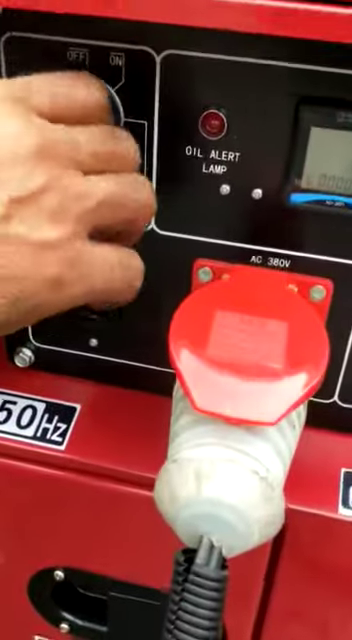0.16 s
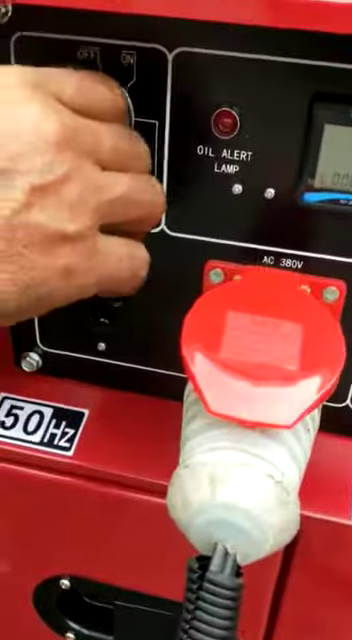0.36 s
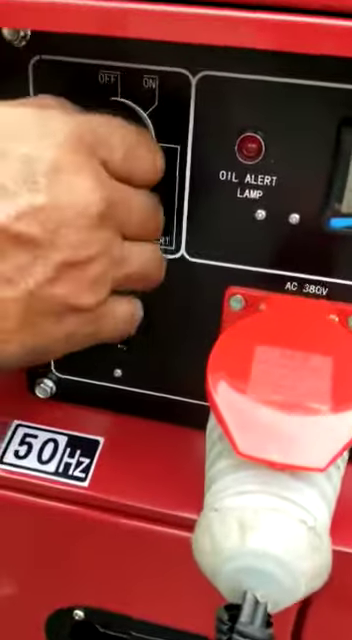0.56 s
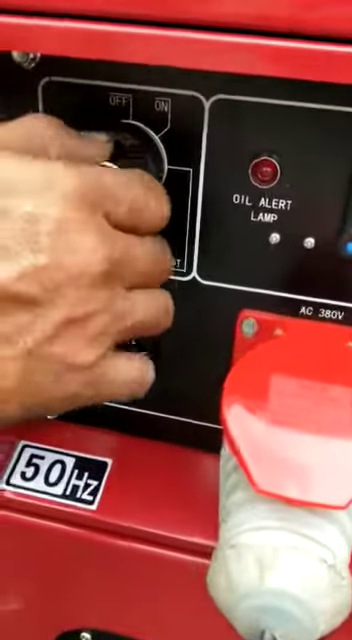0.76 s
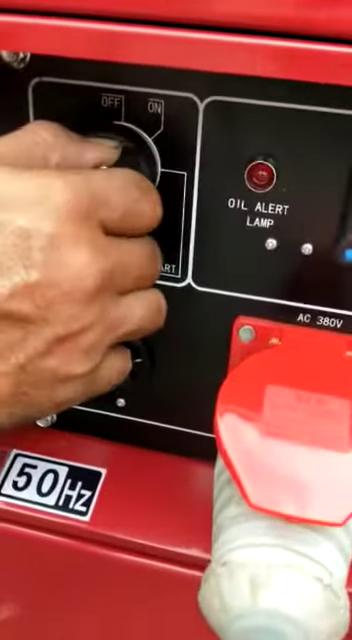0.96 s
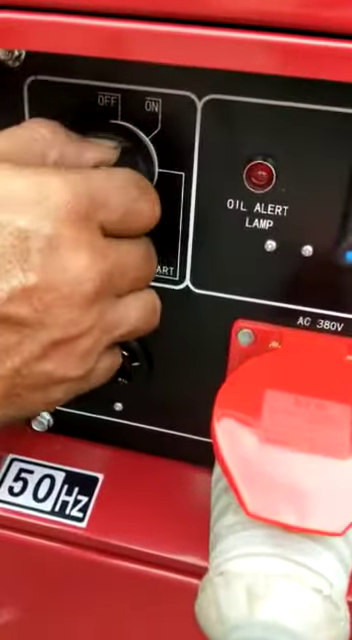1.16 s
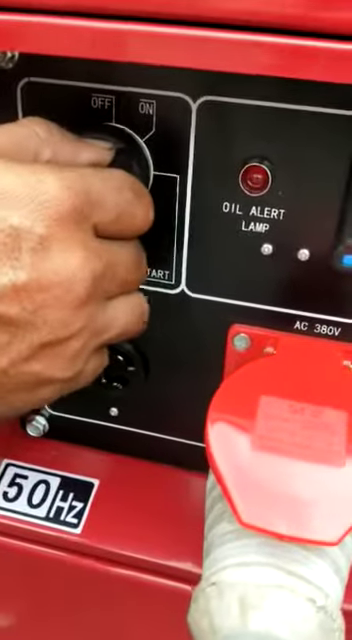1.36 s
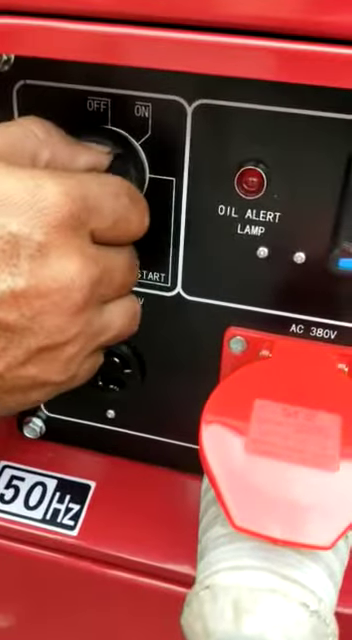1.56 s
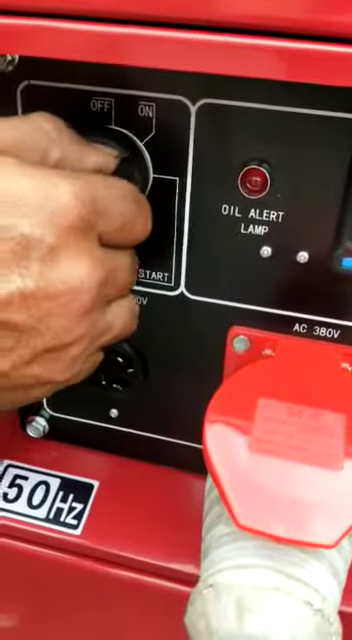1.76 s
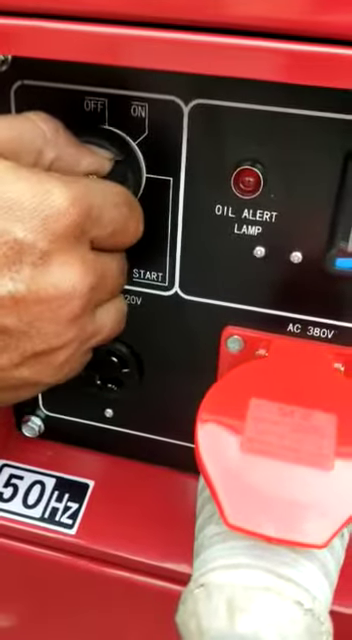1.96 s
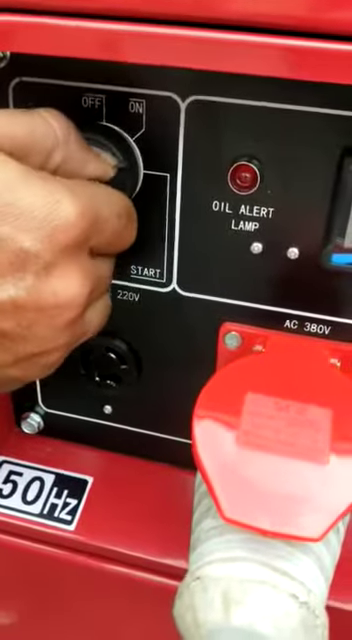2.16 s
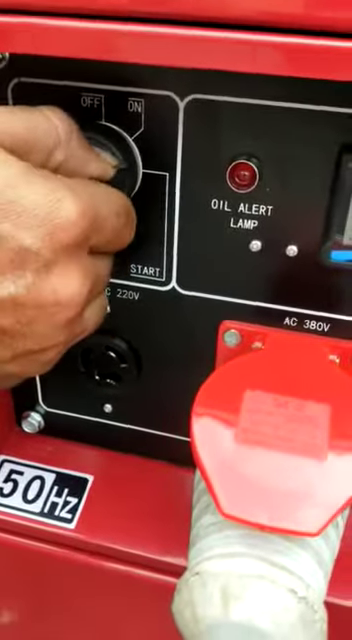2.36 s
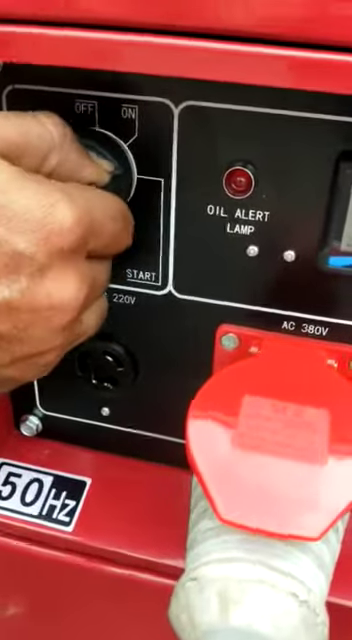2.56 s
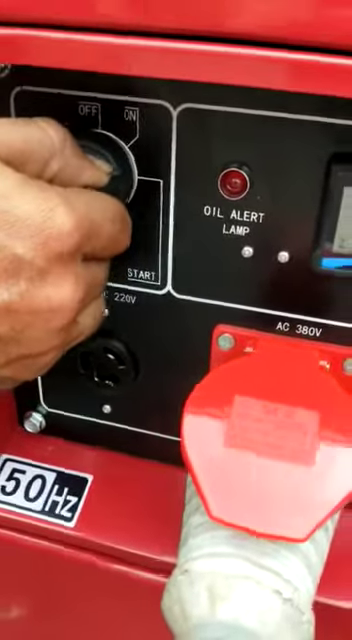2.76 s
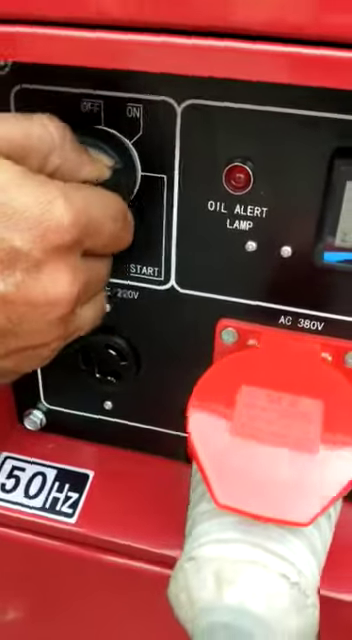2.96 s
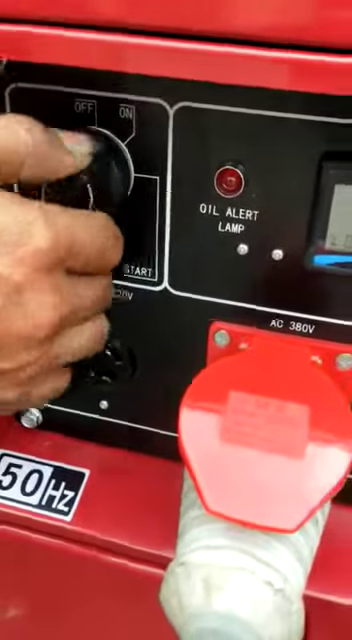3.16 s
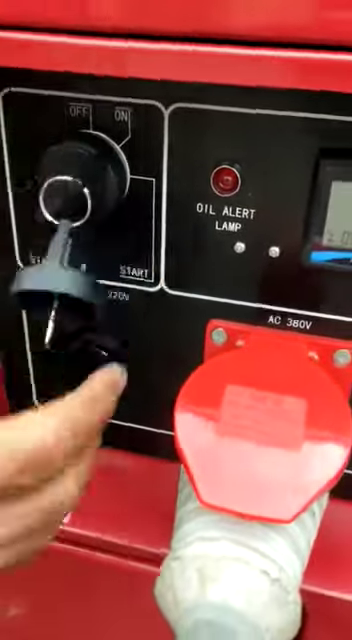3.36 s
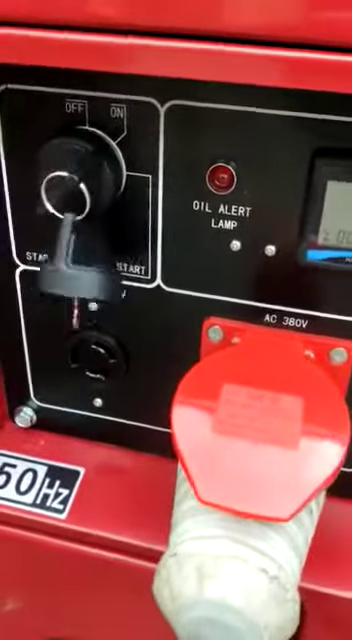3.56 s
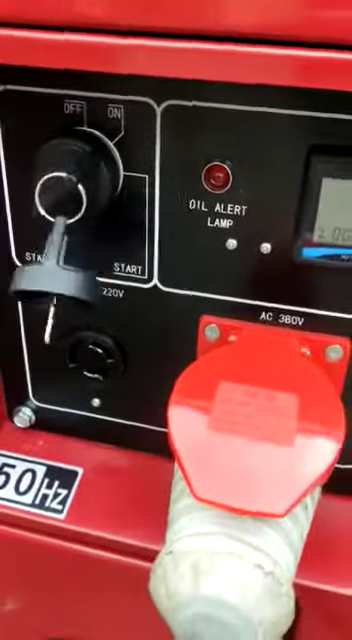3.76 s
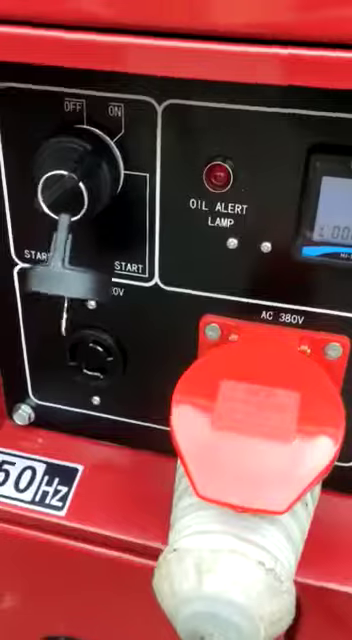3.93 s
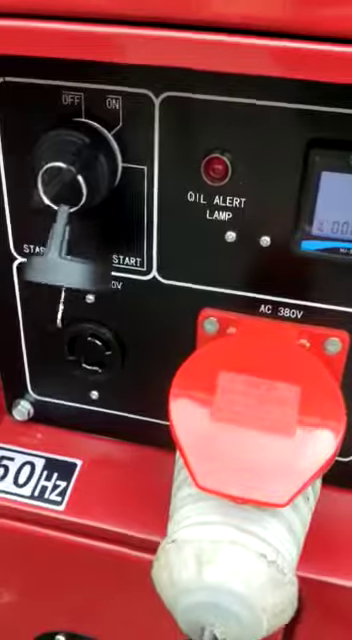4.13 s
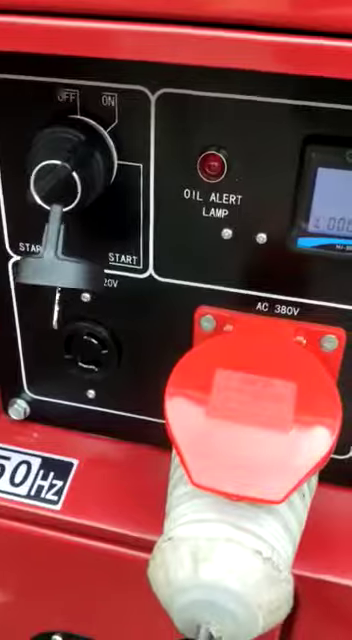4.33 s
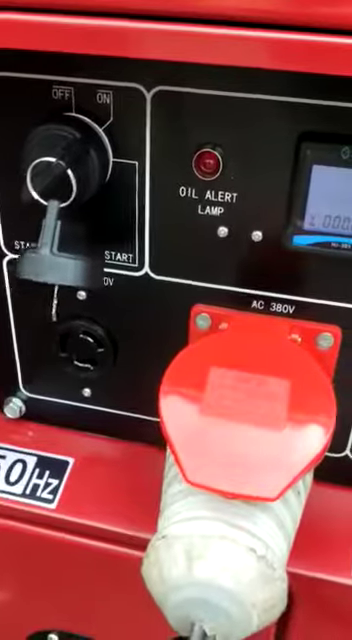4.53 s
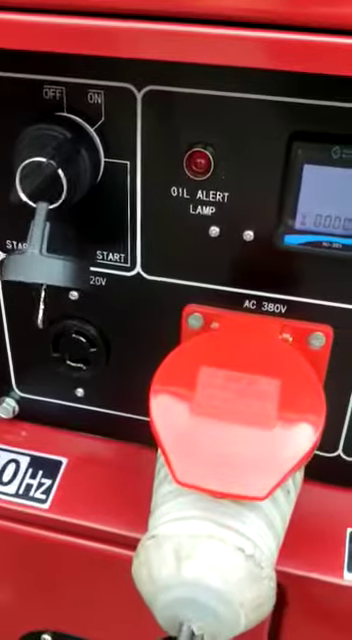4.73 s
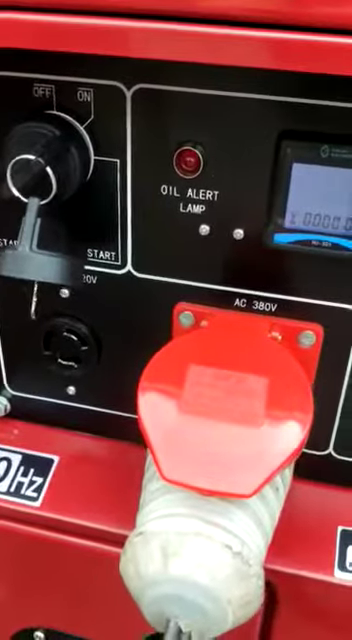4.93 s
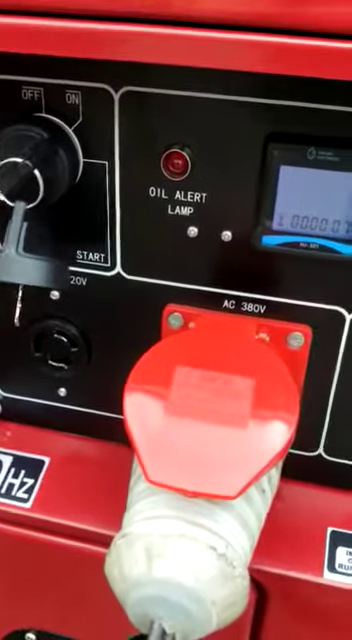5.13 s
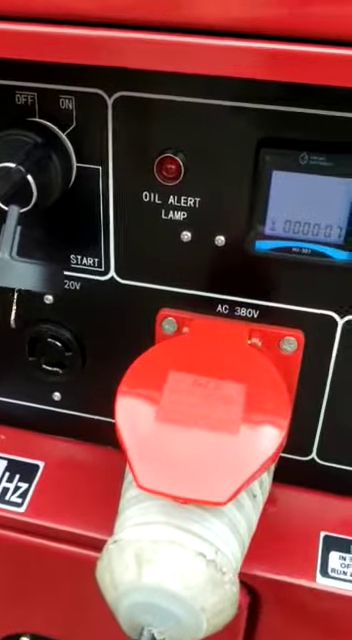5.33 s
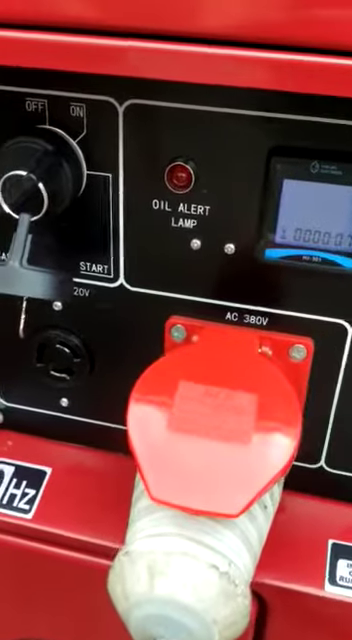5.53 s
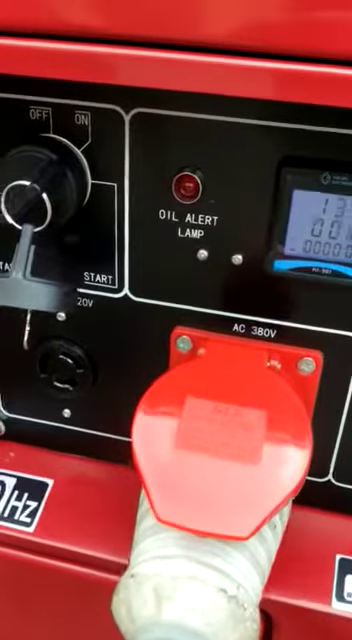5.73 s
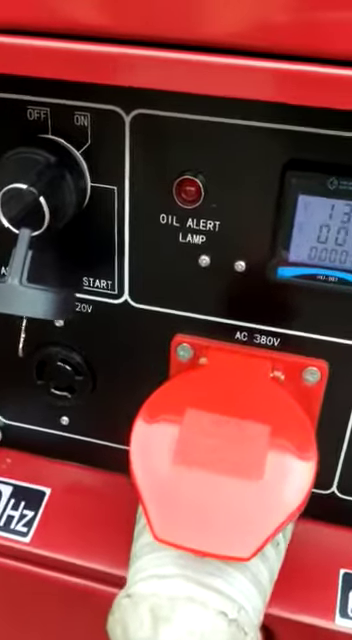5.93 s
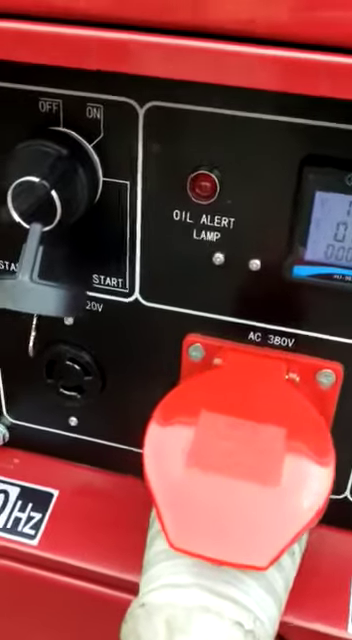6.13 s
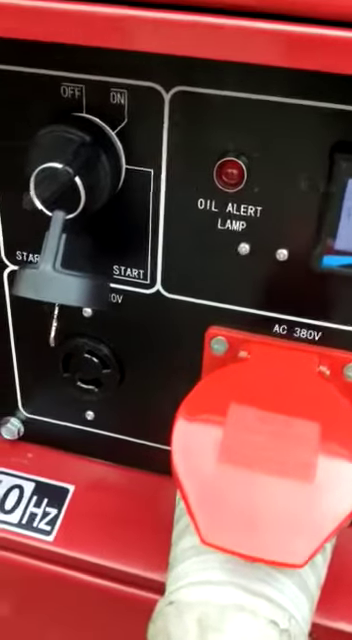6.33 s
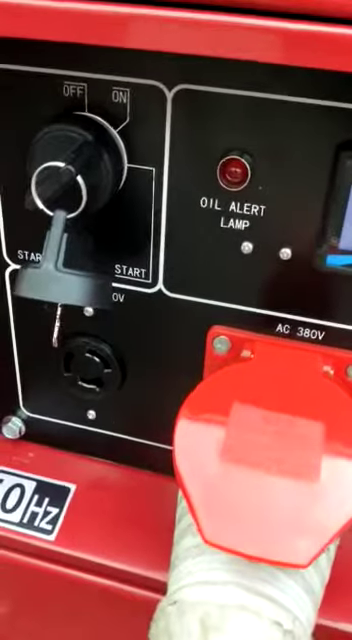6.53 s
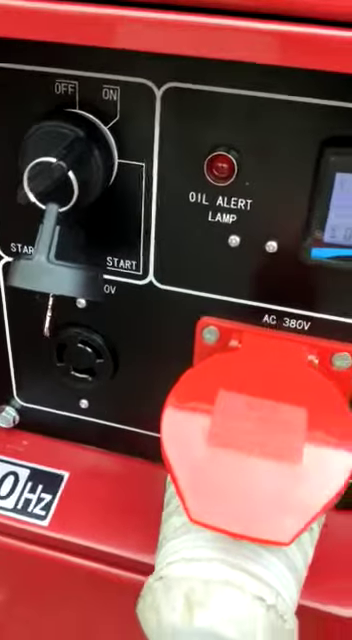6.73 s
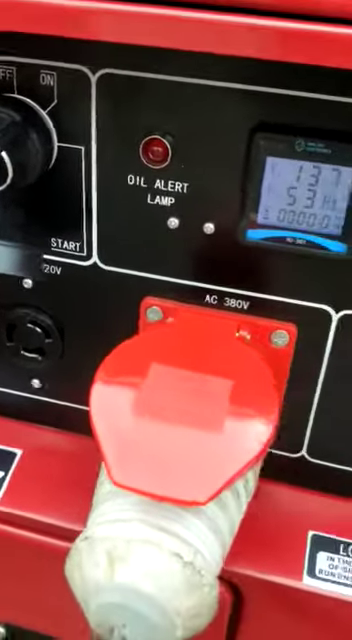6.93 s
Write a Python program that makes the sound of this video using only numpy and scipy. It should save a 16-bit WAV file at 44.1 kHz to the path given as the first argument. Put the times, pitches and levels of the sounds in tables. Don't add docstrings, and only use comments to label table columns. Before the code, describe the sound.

Quiet distant traffic and twittering birds, heard by a close stereo phone microphone. A key snaps over early on; two seconds in, a metallic clunk and short rising electric whine crank a cold single-cylinder diesel. Separate thuds ring the block and steel cabinet, quickening until they merge into a harsh, booming drone, briefly easing before steady loud running.

```python
import sys
import numpy as np
from scipy import signal
from scipy.fft import rfft, irfft, next_fast_len
from scipy.io import wavfile
from scipy.ndimage import uniform_filter1d

SR = 44100
rng = np.random.default_rng(int(sys.argv[2]) if len(sys.argv) > 2 else 0)


def store_wav(level_fs):
    pcm = np.round(np.clip(np.atleast_2d(level_fs), -1, 1) * 32767)
    wavfile.write(sys.argv[1], SR, pcm.T.astype(np.int16))


def invert_db(x):
    u = np.asarray(x, float) / 20
    return 10 ** u


N = 312669
TIME = np.arange(N) / SR

# time in seconds, firings per second.
SPEED = [(2.59, 5.836), (2.8, 6.441), (3.0, 8.51), (3.3, 12.341), (4.0, 22.142), (4.3, 26.019),
         (4.5, 27.074), (4.6, 25.644), (4.7, 26.735), (4.9, 26.424), (7.09, 26.358)]
# time in seconds, force of combustion in dB.
FUEL = [(2.76, -1.5), (3.5, 1.5), (4.1, 1.5), (4.41, 0.5), (4.45, -6), (4.59, -3.5), (4.64, 2),
        (4.75, -1.5), (5.2, -0.5), (6.5, 2), (7.09, 2)]
# share of the cycle, level in dB.
VALVES = [(0.296, -6), (0.562, -3.5), (.86, -7)]
# level in dB, dB per dB of fuel, gain at full speed in dB,
# gain once governed in dB, gain with the starter gear still in mesh in dB.
LAYERS = [
    (-24, 0.26, 6.5, 1.9, -0.5),
    (-21, 0.23, -1.67, -1, 2),
    (-23, 1.1, -0.6, 1.6, 3.1),
    (-40.5, 2.4, 6, -3.4, 0.5),
    (-32.5, 0.63, 3.5, -4, 9.5),
]


def engine():
    (speed,), (fuel_db,) = curves(SPEED), curves(FUEL)
    cycle = np.cumsum(speed * (TIME >= SPEED[0][0])) / SR
    governed = np.clip((speed - 15) / 11, 0, 1)
    locked = np.clip((TIME - 4.2) / 0.73, 0, 1)
    meshed = np.clip((2.97 - TIME) / 0.0167, 0, 1)
    exhaust_db, boom_db, knock_db, ping_db, clatter_db = [
        db + share * fuel_db + fast_db * governed + held_db * locked + mesh_db * meshed
        for db, share, fast_db, held_db, mesh_db in LAYERS]

    fuel = np.clip((fuel_db + 9) / 9, .1, 1)
    firing = fuel * strokes(cycle, 0, scatter_db=1.2)
    valves = sum(invert_db(db) * strokes(cycle, angle, scatter_db=1.) for angle, db in VALVES)

    sound = exhaust(cycle, governed, exhaust_db)
    sound += cabinet_boom(cycle, firing, valves, locked, boom_db)
    sound += block_knock(cycle, firing, valves, governed, locked, knock_db)
    sound += panel_rasp(firing, valves, locked, fuel_db)
    sound += metal_ping(firing, ping_db)
    sound += clatter(firing, valves, governed, locked, clatter_db)
    return sound * np.clip((TIME - 2.735) / 0.0041, 0, 1)


# frequency in Hz, width in Hz, level in dB.
MUFFLER = [(79.6, 101, -7.5), (127, 17.6, 3), (189.8, 24.5, -3), (263, 38, -3), (347, 70, -9.5)]
# multiple of the firing rate, level in dB.
DRONE = [(1, -36.5), (2, -17), (3, -3.5), (4, 1.5), (5, -5), (6, -12), (7, -4.5), (8, -15), (9, -9.5),
         (10, -27.5), (11, -10), (12, -43.5)]
# multiple of the firing rate, level in dB.
RUNUP = [(5, -20), (7, -2.5), (10, -3), (11, -3), (12, -8)]
# start in seconds, attack in seconds, hold in seconds,
# time to fall 60 dB in seconds, level in dB.
SWEEP = [(3.5, 0.13, 0.4, 2.4, -25)]


def exhaust(cycle, governed, level_db):
    warming_db = 0.7 * np.clip(TIME - 5, 0, None)
    breaths = strokes(cycle, .28, 1.5) + .8 * strokes(cycle, .6, 1.5)
    puffs = burst(breaths, modes(MUFFLER), t60=0.14, fresh=0.13, steady=1.0, blow=0.42)
    steady_drone = drone(cycle, DRONE, spread=.45)
    breathing = governed * steady_drone + (1 - 0.6 * governed) * puffs
    return invert_db(level_db + warming_db) * breathing + swells(SWEEP) * drone(cycle, RUNUP, spread=.45)


# frequency in Hz, width in Hz, level in dB.
BOOM = [(449.3, 60, 0), (508, 79, -1), (649, 65, -8), (719.6, 31, -2.5), (853, 137, -9.5)]
# multiple of the firing rate, level in dB.
PANELS = [(14, -14), (16, -11), (17, -19), (19, -32), (20, -23), (21, -22.5), (25, -19), (26, -16),
          (27, -13.5), (30, -16), (33, -18)]


def cabinet_boom(cycle, firing, valves, locked, level_db):
    blows = firing + .4 * valves
    boom = burst(blows, modes(BOOM), t60=.11, fresh=.9, steady=.55 + 1.1 * locked, blow=.6)
    panels = drone(cycle, PANELS, spread=0)
    return invert_db(level_db) * (0.64 * locked * panels + (1 - 0.29 * locked) * boom)


# frequency in Hz, width in Hz, level in dB.
KNOCK = [(966, 150, -4.5), (1289, 188, 0), (1418, 218, -1), (1876, 550, -7), (2142, 370, -4.5),
         (2870, 1640, -13.5)]
# multiple of the firing rate, level in dB.
BLOCK = [(36, -3.5), (38, -2), (39, -24), (42, -2), (44, -35), (45, -3), (46, -24.5), (48, -14), (51, -50),
         (52, -31), (54, -15.5), (56, -3), (59, -42)]


def block_knock(cycle, firing, valves, governed, locked, level_db):
    blows = firing + .85 * governed * valves
    knock = burst(blows, twice(modes(KNOCK)), t60=.095, fresh=.55,
                  steady=.25 + .1 * locked, blow=.95 - .4 * locked)
    fading = invert_db(-9 * (cycle % 1))
    ringing = .7 * locked * fading * drone(cycle, BLOCK, spread=0)
    return invert_db(level_db - .7) * (ringing + (1 - .35 * locked) * knock)


# frequency in Hz, width in Hz, level in dB.
RASP = [(1746, 400, 1), (2180, 300, 3.5), (2800, 980, -2)]


def panel_rasp(firing, valves, locked, fuel_db):
    buzz = burst(firing + valves, twice(modes(RASP)), t60=.12, fresh=.8, steady=.9, blow=.4)
    return invert_db(-33 + .6 * fuel_db) * (.55 + .45 * locked) * buzz


# frequency in Hz, width in Hz, level in dB.
PING = [(3220, 160, -6), (3450, 150, 0), (3610, 130, -3)]


def metal_ping(firing, level_db):
    return invert_db(level_db) * burst(firing, twice(modes(PING)), t60=.05, fresh=.5, steady=.4, blow=.8)


# frequency in Hz, level in dB per Hz.
CLATTER = [(2290, 1.5), (3500, -5.5), (4050, -11.5), (4500, -5.5), (5150, -2.5), (6800, -11.5),
           (9530, -33.5), (12700, -14.5), (13600, -24), (15300, -11), (16200, -40), (16500, -52)]


def clatter(firing, valves, governed, locked, level_db):
    blows = (0.95 + 0.54 * governed - 0.51 * locked) * firing + 0.24 * valves
    return invert_db(level_db) * burst(blows, shape(CLATTER), t60=0.13, fresh=1.7,
                                 steady=1.06 + 1.9 * locked, blow=0.088)


# time in seconds, frequency in Hz, level in dB.
WHINE = [(2.27, 520, -55), (2.36, 590, -38), (2.44, 690, -34), (2.5, 745, -36), (2.57, 790, -39),
         (2.66, 800, -55)]


def motor_whine():
    hz, level_db = curves(WHINE)
    turn = 2 * np.pi * np.cumsum(hz * (1 + 0.0055 * wobble(65))) / SR
    overtones = enumerate([1.15, 0.5, 0.85, 0.76, 0.14], start=1)
    return invert_db(level_db + 2.5 * wobble(39.6)) * sum(size * np.sin(k * turn) for k, size in overtones)


# start in seconds, attack in seconds, hold in seconds,
# time to fall 60 dB in seconds, level in dB.
THROBS = [
    (2.23, 0.031, .005, 0.73, -24.5),
    (2.545, 0.025, 0.41, 0.43, -21),
]
MESHES = [
    (2.215, 0.016, .005, 0.21, -17),
    (2.535, 0.03, 0.032, 0.22, -19),
    (2.635, 0.0148, 0.0054, 0.27, -22),
    (2.74, .016, .002, .1, -3.5),
]
# frequency in Hz, level in dB per Hz.
GEAR = [(180, -1.5), (300, -6), (525, 4), (683, -2), (945, -5.5), (1120, -6.5), (1650, -13.5), (2210, -17),
        (2600, -30), (3380, -45.5), (5720, -120)]
# frequency in Hz, level in dB per Hz.
BRUSH = [(1290, -6.5), (2200, -3.5), (2580, -8.5), (3270, -5.5), (3560, -4), (4040, -34), (4390, -8),
         (5510, -11), (6920, -15.5), (7470, -29), (13800, -29), (14500, -44), (16500, -93)]
# time in seconds, peak in dB.
SOLENOID = [
    (2.215, -36),
    (2.228, -26),
    (2.236, -4),
    (2.289, -19),
]
# frequency in Hz, level in dB per Hz.
PLUNGER = [(130, -17), (220, -7), (433, 12), (669, -7), (864, 14), (1380, -37.5), (1810, 4), (2070, -24),
           (2230, -21), (2400, -40), (3770, -28), (5580, -26), (8000, -45), (10400, -80), (17600, -120)]
# time in seconds, peak in dB.
KICK = [
    (2.558, -23),
    (2.584, -10.5),
]
# frequency in Hz, level in dB per Hz.
SLAP = [(180, -36), (300, -12), (577, -8), (1830, -19), (2170, -8), (3410, -20), (4100, -22), (5280, -13),
        (7890, -29.5), (15200, -29), (16500, -39)]
# frequency in Hz, width in Hz, level in dB.
MOUNTS = [(62, 11, -7.5), (99.6, 26, 1), (146.2, 54, -4.5)]
# start in seconds, attack in seconds, hold in seconds,
# time to fall 60 dB in seconds, level in dB.
ROCKING = [
    (2.55, 0.072, 0.16, 1.27, -20.5),
    (2.8, 0.091, 0.29, 1.5, -31.5),
]


def starter():
    engaged = np.clip((TIME - 2.205) / 0.047, 0, 1) * np.clip((2.78 - TIME) / 0.076, 0, 1)
    brush_db = -30.5 - 8 * np.clip((TIME - 4) / 0.043, 0, 1)
    housing = .5 * rush(modes([(3526, 7.8, -5.5), (1155, 22, -9)]))
    pumped_air = swells(THROBS) * rush(modes(MUFFLER))
    gears = (invert_db(-36.5) + swells(MESHES)) * rush(shape(GEAR))
    brushes = invert_db(brush_db) * (rush(shape(BRUSH)) + housing)
    running = engaged * (pumped_air + gears + brushes + motor_whine())
    sound = filtered(running, lambda f: (f / (30 + f)) ** 3)
    sound += swells(ROCKING) * rush(modes(MOUNTS))
    return sound + hits(SOLENOID, PLUNGER, t60=0.1) + hits(KICK, SLAP, t60=0.056)


# time in seconds, peak in dB.
KEY = [
    (.493, -44),
    (.5148, -13),
]
# frequency in Hz, level in dB per Hz.
BARREL = [(120, -24), (200, -8), (342, -1.5), (756, -11), (1020, 6), (1610, -8.5), (2160, 4.5), (2370, -2),
          (3560, 4), (3980, -13), (4290, 4), (5550, 3.5), (7880, -13), (14500, -13), (16500, -31)]


def key():
    click = hits(KEY, BARREL, t60=0.041)
    return click + invert_db(-18) * rattle(click, t60=0.3)


# seconds after its start, length in seconds, from Hz, to Hz, level in dB.
CHIRP = [(0, 0.032, 5930, 5000, -2), (.018, 0.0227, 3570, 4700, -0.5), (0.034, 0.023, 4900, 4440, 1.5),
         (0.036, .028, 3870, 3670, -1), (.056, 0.028, 3170, 2800, -4.5), (0.08, .022, 5390, 5350, 3),
         (0.093, .016, 3900, 5200, 4), (.106, 0.027, 5330, 4480, 6.5), (0.111, 0.032, 3900, 3600, 1),
         (0.127, 0.03, 3160, 2930, 0)]
# start in seconds, pitch factor, level in dB.
CALLS_AT = [
    (0.983, 1.02, -49.5),
    (1.944, .98, -49),
]


def sparrow():
    song = np.zeros(N)
    for start, pitch, call_db in CALLS_AT:
        for s, length, from_hz, to_hz, db in CHIRP:
            u = np.linspace(0, 1, int(length * SR))
            turn = 2 * np.pi * np.cumsum(pitch * (from_hz + (to_hz - from_hz) * u)) / SR
            burr = 1.07 * np.sin(2 * np.pi * 230 * u * length)
            note = np.sin(np.pi * u) * np.sin(turn + burr)
            song[int((start + s) * SR):][:len(u)] += invert_db(call_db + db) * note
    return song * invert_db([[-3.], [1.5]]) + invert_db(-1.0) * rattle(song, t60=0.37)


# time in seconds, swell in dB.
PASSES = [(0, 2), (.6, 4.5), (1.35, 5.5), (1.6, 3), (2.12, 3)]
# frequency in Hz, level in dB per Hz.
HUM = [(12, -59), (30, -8), (97, -6), (113, 1), (157, -9.5), (178, 0.5), (247, -12.5), (289, -14),
       (450, -18.5), (580, -28), (990, -120)]
# frequency in Hz, level in dB per Hz.
BUSTLE = [(240, -40), (400, 1.5), (490, -14), (621, 1), (1090, -9.5), (2040, -16.5), (2800, -17.5),
          (3640, -24), (6160, -120)]
# frequency in Hz, level in dB per Hz.
FLOCK = [(1470, -84), (2500, -52), (3090, -16), (3530, -4.5), (5310, 3.5), (5640, -1), (5990, -48),
         (7000, -50), (9100, -83.5), (15400, -120)]
# start in seconds, attack in seconds, hold in seconds,
# time to fall 60 dB in seconds, level in dB.
TWITTERS = [
    (.02, 0.01, .1, 0.55, -65.5),
    (.14, 0.047, .005, 0.34, -51.5),
    (1.05, .25, 0.013, 2.1, -70.5),
    (1.77, 0.052, .005, .4, -71),
]
# time in seconds, peak in dB.
TAP = [
    (1.268, -35),
]
# frequency in Hz, level in dB per Hz.
CASE = [(40, -20), (120, 9.5), (400, -7), (1200, -20), (2500, -28), (4000, -70)]


def yard():
    traffic_db = sum(db * np.exp(-((TIME - s) / 0.14) ** 2) for s, db in PASSES)
    near, far = rush(shape(HUM))
    hum_paths = np.array([near + .2 * far, 1.18 * near - 0.099 * far])
    hum = invert_db(-60 + traffic_db + 0.67 * wobble(11.0)) * hum_paths
    bustle = invert_db(-69.5 + 2.0 * traffic_db) * patchy(rush(shape(BUSTLE)), depth_db=3.5)
    flock = (invert_db(-79) + swells(TWITTERS)) * patchy(rush(shape(FLOCK)), depth_db=5.5)
    return hum + bustle + flock + hits(TAP, CASE, t60=.02)


def unit(x):
    return x / np.sqrt(np.mean(x ** 2) + 1e-20)


def along(points, hz):
    f, v = np.transpose(points)
    return np.interp(np.log(hz + 1), np.log(f + 1), v)


def curves(rows):
    s, *cols = np.transpose(rows)
    return [np.interp(TIME, s, c) for c in cols]


def wobble(rate):
    knots = rng.standard_normal(int(N * rate / SR) + 2)
    return np.interp(TIME * rate, np.arange(len(knots)), knots)


def filtered(x, response):
    m = next_fast_len(N + SR // 8, True)
    return irfft(rfft(x, m) * response(np.fft.rfftfreq(m, 1 / SR)), m)[..., :N]


def modes(peaks):
    return lambda f: sum((-1) ** k * invert_db(db) * 1j * f * w / (c * c - f * f + 1j * f * w)
                         for k, (c, w, db) in enumerate(peaks))


def twice(response):
    return lambda f: response(f) ** 2


def shape(spectrum):
    return lambda hz: invert_db(along(spectrum, hz))


def rush(response):
    m = next_fast_len(N)
    white = rng.standard_normal((2, m // 2 + 1, 2)) @ [1, 1j]
    return unit(irfft(white * response(np.fft.rfftfreq(m, 1 / SR)), m)[:, :N])


def strokes(cycle, angle, scatter_db):
    at = np.flatnonzero(np.diff(np.floor(cycle - angle)) > 0)
    out = np.zeros(N)
    out[at] = invert_db(scatter_db * rng.standard_normal(len(at))) * np.sqrt(np.gradient(at))
    return out


def burst(pulses, response, t60, fresh, steady, blow):
    keep = invert_db(-120 / SR / t60)
    power = signal.lfilter([1 - keep], [1, -keep], pulses ** 2)
    noise = rng.standard_normal((2, N)) * np.sqrt(fresh ** 2 * power + steady ** 2)
    direct = blow * np.array([pulses, np.roll(pulses, shift=41)])
    return unit(filtered(direct + rattle(pulses, t60) + noise, response))


def rattle(pulses, t60):
    t = np.arange(int(SR * t60)) / SR / t60
    tail = rng.standard_normal((2, len(t))) * invert_db(-60 * t) * (1 - np.exp(-t / .008))
    return signal.oaconvolve(np.atleast_2d(pulses), tail / np.linalg.norm(tail[0]), axes=1)[:, :N]


def hits(events, spectrum, t60):
    s, db = np.transpose(events)
    pulses = np.bincount((s * SR).astype(int), invert_db(db), N)
    sound = filtered(rattle(pulses, t60), shape(spectrum))
    return sound * pulses.max() / np.abs(sound).max()


def drone(cycle, orders, spread):
    k, db = np.transpose(orders)
    angle = np.linspace(0, 1, num=4097)
    delay = spread * k ** 2 + rng.uniform(0, 2 * np.pi, len(k)) * (k > 8)
    wave = invert_db(db) @ np.exp(1j * (2 * np.pi * np.outer(k, angle) + delay[:, None]))
    return unit(np.array([np.interp(cycle % 1, angle, path) for path in (wave.real, wave.imag)]))


def swells(rows):
    total = 0
    for s, attack, hold, t60, db in rows:
        rise = np.clip((TIME - s) / attack, 0, 1) ** 2
        fall_db = 60 * np.clip(TIME - s - attack - hold, 0, None) / t60
        total = total + invert_db(db - fall_db) * rise
    return total


def patchy(x, depth_db):
    z = signal.stft(x, nperseg=512)[2]
    field = uniform_filter1d(rng.standard_normal(z.shape[1:]), size=3, axis=0)
    field = uniform_filter1d(field, size=24, axis=1)
    return unit(signal.istft(z * invert_db(depth_db * unit(field)), nperseg=512)[1][:, :N])


# frequency in Hz, likeness from 0 to 1.
ALIKE = [(60, .995), (150, .98), (350, .92), (700, .68), (2000, .55), (4000, .28), (12000, .3)]
# frequency in Hz, lead in radians.
LEAD = [(30, 0), (200, .15), (520, .8), (1210, 2.2), (1550, 1.9), (2240, 2.8), (3530, 4.8), (5430, 7),
        (16000, 20)]
# frequency in Hz, difference in dB.
TILT = [(60, -.8), (200, -1.5), (400, -2.2), (750, -2.2), (1300, 2.6), (2400, 2.8), (5000, -5),
        (8500, -1.2), (14000, -2.8)]


def ports(paths):
    turn = lambda hz: np.arccos(np.clip(along(ALIKE, hz), 0, 1)) / 2
    main, other = filtered(paths, lambda hz: np.array([np.cos(turn(hz)), np.sin(turn(hz))]))
    half = lambda hz: invert_db(along(TILT, hz) / 2) * np.exp(.5j * along(LEAD, hz))
    left_right = np.array([main + other, main - other])
    return filtered(left_right, lambda hz: np.array([half(hz), 1 / half(hz)]))


def scene():
    return ports(engine() + starter()) + key() + sparrow() + yard()


def band_limit(x):
    return signal.sosfilt(signal.butter(12, 16740, fs=SR, output="sos"), x)


def record(dry):
    sound = filtered(dry, lambda hz: (1j * hz / (28 + 1j * hz)) * (hz < 15950))
    sound = sound / (1 + np.abs(sound / .9) ** 4) ** (1 / 4)
    hz, _, z = signal.stft(sound, SR, nperseg=2048)
    high = hz > 6300
    chance = rng.uniform(size=(len(hz) // 8 + 1, z.shape[2]))
    bands = np.repeat(chance, repeats=8, axis=0)[:len(hz)]
    weak = np.abs(z) < 1.1 * uniform_filter1d(np.abs(z), size=32, axis=1)
    treble = np.abs(z[:, high]).mean(axis=(0, 1))
    calm = treble < 1.18 * uniform_filter1d(treble, size=5)
    holes = ((bands < .45) | weak) & high[:, None] & calm
    sound = signal.istft(z * ~holes, SR, nperseg=2048)[1][:, :N]
    return band_limit(sound)


dry = scene()
out = record(dry)
store_wav(out)
```